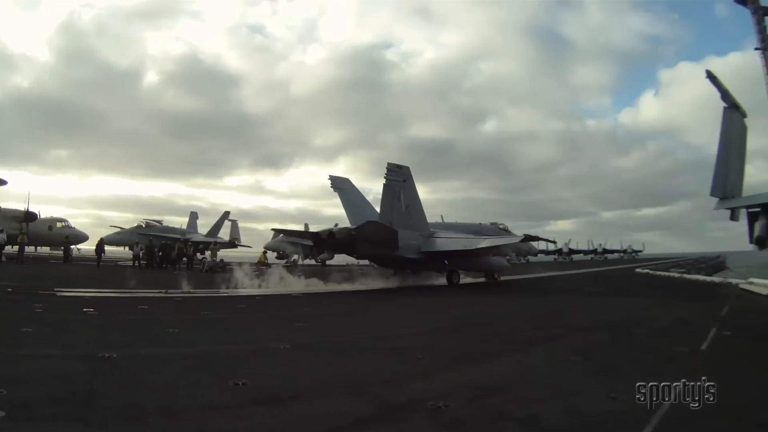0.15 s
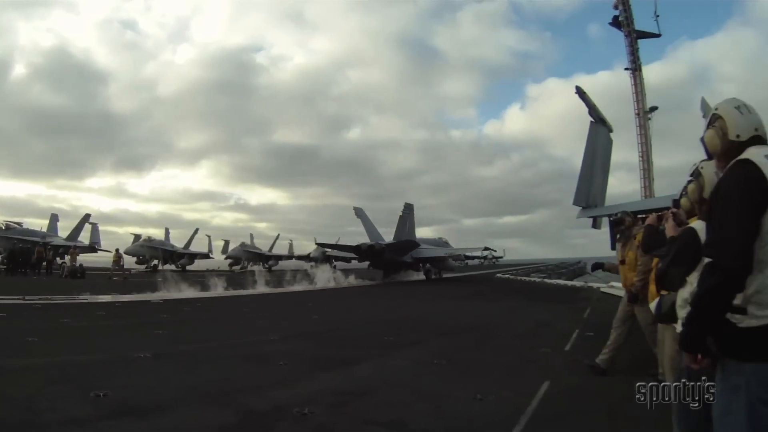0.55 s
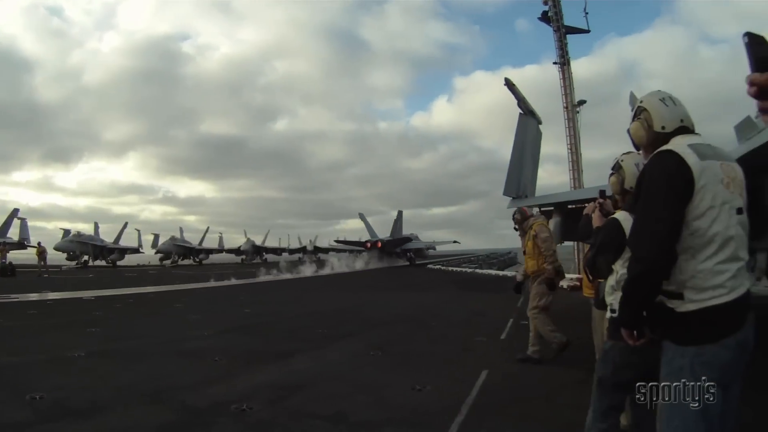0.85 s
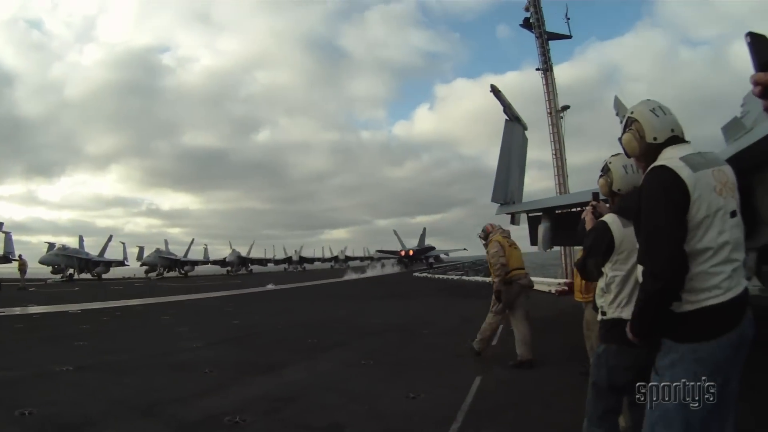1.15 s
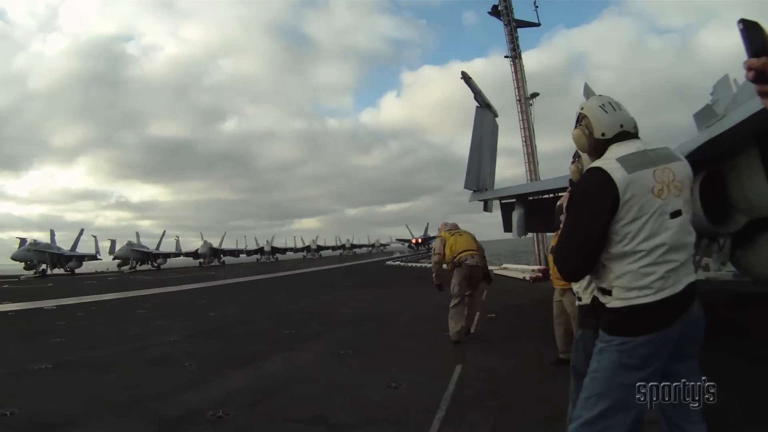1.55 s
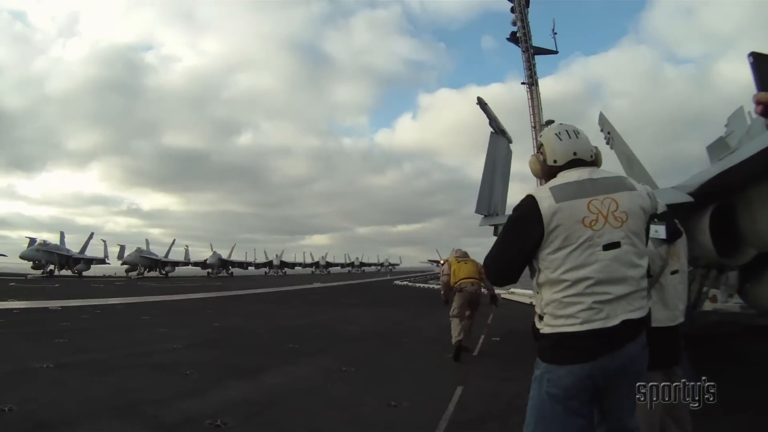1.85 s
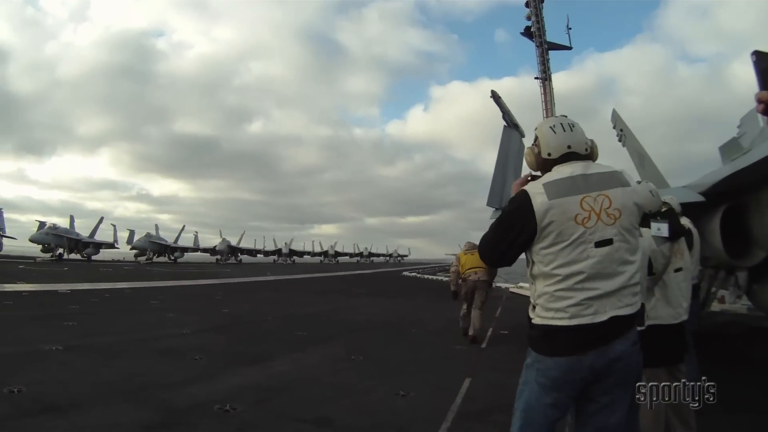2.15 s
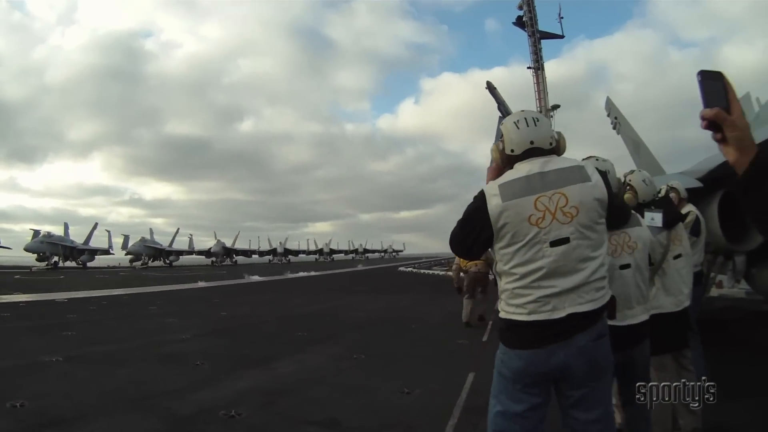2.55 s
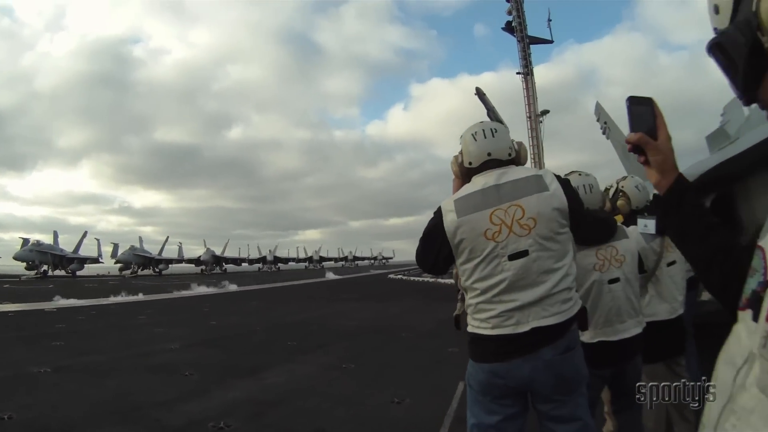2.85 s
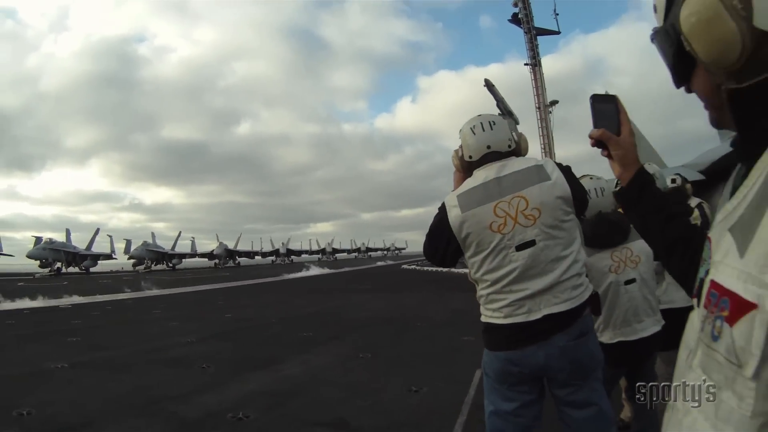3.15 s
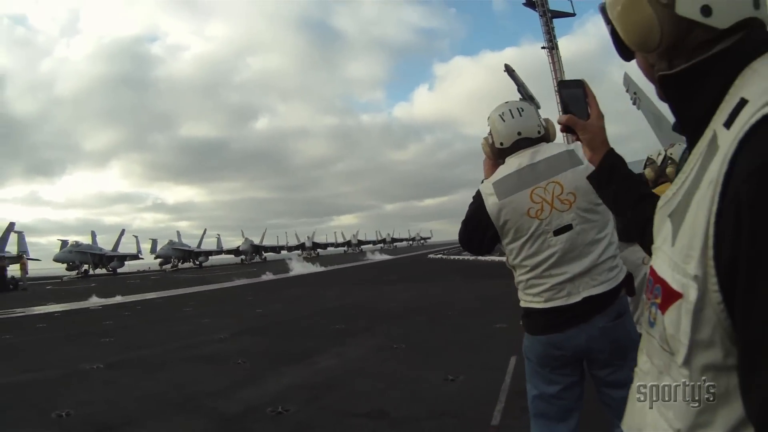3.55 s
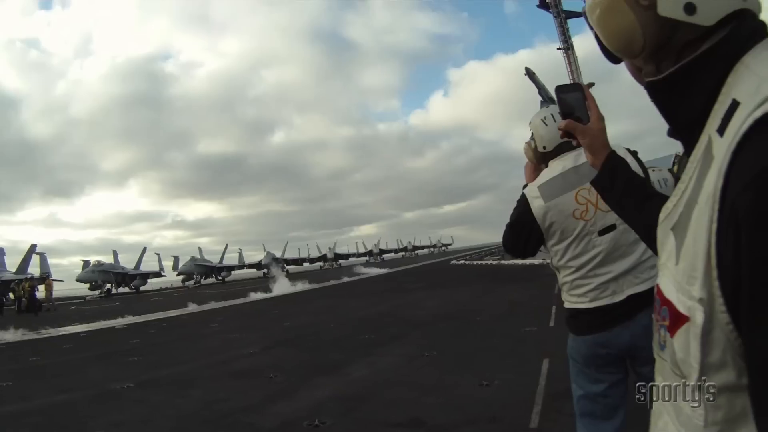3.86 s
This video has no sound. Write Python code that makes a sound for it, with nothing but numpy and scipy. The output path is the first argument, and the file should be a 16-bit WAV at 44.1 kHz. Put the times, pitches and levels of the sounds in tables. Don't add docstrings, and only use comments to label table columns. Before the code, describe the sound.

Deafening fighter jet roar, distorted at first, fades away across a ship deck, then echoes faintly

```python
import sys
import numpy as np
from scipy import signal
from scipy.io import wavfile
from scipy.ndimage import uniform_filter1d

SR = 44100
rng = np.random.default_rng(int(sys.argv[2]) if len(sys.argv) > 2 else 0)


def linear_from_db(decibels):
    return 10 ** (np.asarray(decibels, float) / 20)


def bounce(signal):
    frames = np.transpose(np.atleast_2d(signal))
    limited = np.clip(frames, -1, 1)
    pcm = np.round(limited * 32767).astype(np.int16)
    wavfile.write(sys.argv[1], SR, pcm)


N = 176400
TIME = np.arange(N) / SR


def evened(x):
    return x / np.sqrt(np.mean(x ** 2) + 1e-20)


def read(points, hz):
    f, value = np.transpose(points)
    return np.interp(np.log(hz + 1), np.log(f + 1), value)


def curve(rows, column):
    rows = np.array(rows)
    return np.interp(TIME, rows[:, 0], rows[:, column])


def drift(low_hz, top_hz, t):
    f = np.geomspace(low_hz, top_hz, 30)[:, None]
    phase = rng.random(f.shape)
    waves = np.sin(2 * np.pi * (f * t + phase)) / np.sqrt(f)
    return evened(waves.sum(0))


def turbulence(colour, patch_db, flicker_db, air_db_per_s=0, lean=((0, 0), (1, 0))):
    size, hop = 1024, 256
    frames, hz = N // hop + 5, np.fft.rfftfreq(size, 1 / SR)
    t = np.arange(frames) * hop / SR
    real, imaginary, patches = rng.standard_normal((frames, len(hz), 3)).T

    patches = uniform_filter1d(patches, size=14, axis=0)
    patches = evened(uniform_filter1d(patches, size=10, axis=1))

    air_db = air_db_per_s * np.outer((hz / 10000) ** 1.5, t)
    octaves_below = np.clip(np.log2(2500 / (hz + 1)), 0, 1)
    lean_db = np.outer(octaves_below, np.interp(t, *np.transpose(lean)))
    level_db = colour(hz)[:, None] + patch_db * patches + lean_db - air_db

    spectra = (real + 1j * imaginary) * linear_from_db(level_db)
    noise = evened(signal.istft(spectra, nperseg=size, noverlap=size - hop)[1][:N])
    return noise * linear_from_db(flicker_db * drift(6, 90, TIME))


# (frequency [Hz], density [dB per Hz])
CASE_LOW = [(25, -27), (100, -25), (220, -28.5), (600, -14), (1120, -3), (1290, 2.5), (1470, -8),
            (1740, -15.5)]
CASE_HIGH = [(1950, -9), (2900, -6), (3600, -3.5), (4200, 3.7), (5600, -13.5), (9800, -28), (11800, -33.5),
             (14500, -56)]


def through_case(hz):
    return read(list(CASE_LOW) + list(CASE_HIGH), hz)


# (time [s], roar level before overload [dB], aft rumble against roar [dB])
JET_PASS = [(0, -8, -19), (.3, -5, -21), (.6, -5.5, -7.5), (.85, -8, -9), (1.15, -13, -6),
            (1.35, -15.5, -9.5), (1.55, -17.5, -9.5), (1.7, -20, -10.5), (2.0, -19, -18.5), (2.2, -21, -19),
            (2.45, -25, -11), (2.55, -27, -12.5), (2.64, -32.5, -6.5), (2.76, -37.5, -6.5),
            (3.0, -39.5, -8.5), (3.35, -44.5, -8), (4, -37.5, -32)]
# (frequency [Hz], density [dB per Hz])
EDDY_RUMBLE = [(30, -23), (70, -11.5), (130, -0.5), (210, 3.4), (300, -3), (500, -1.5), (850, -1),
               (1300, -39.5)]
# (time [s], lean below 2.5 kHz, full from 1.25 kHz down [dB])
EXHAUST_LEAN = [(0, 1.6), (.2, 0.5), (.36, 5), (.6, 2.6), (.8, -0.9), (1.15, 2.2), (1.55, -0.5),
                (1.95, -2.1), (2.5, 2.7)]


def jet():
    patch_db, flicker_db = 0.45, 0.64
    roar = turbulence(through_case, patch_db, flicker_db, air_db_per_s=7, lean=EXHAUST_LEAN)
    rumble = turbulence(lambda hz: read(EDDY_RUMBLE, hz), patch_db, flicker_db)
    gusts_db = 0.25 * drift(1.353, 9, TIME)
    level = linear_from_db(curve(JET_PASS, column=1) + gusts_db)
    return level * (roar + linear_from_db(curve(JET_PASS, column=2)) * rumble)


# (time [s], level [dB])
ECHO_SWELL = [
    (3.3, -70),
    (3.44, -55),
    (3.47, -42.5),
    (3.63, -38),
    (3.68, -36),
    (3.76, -35),
    (3.86, -31),
    (3.92, -34.5),
    (4, -38),
]
# (frequency [Hz], tilt [dB])
ECHO_TILT = [(100, -5.5), (400, 11.5), (700, 7), (1000, 9.5), (1280, 3), (1550, 7.5), (2100, 0.5),
             (9000, -13.5)]
# (time [s], lean below 2.5 kHz, full from 1.25 kHz down [dB])
ECHO_LEAN = [(3.45, 2), (3.63, -9.5), (3.67, 2), (3.78, -1.5), (3.87, -3), (3.92, -8), (4, -2)]


def echo():
    reflected = turbulence(lambda hz: through_case(hz) + read(ECHO_TILT, hz),
                           patch_db=1.4, flicker_db=0.8, lean=ECHO_LEAN)
    return linear_from_db(curve(ECHO_SWELL, column=1)) * reflected


# (frequency [Hz], tilt [dB])
DECK_TILT = [(40, 20), (120, 21.5), (215, 31.5), (300, 20), (600, 9.5), (1500, -10), (4200, -2),
             (10000, -13)]


def deck():
    idle = turbulence(lambda hz: through_case(hz) + read(DECK_TILT, hz), patch_db=1.1, flicker_db=0.6)
    return linear_from_db(-42) * idle


def scene():
    return (jet() + echo() + deck())[None]


def flattened(x, ceiling):
    knee = 14.0
    return x / (1 + abs(x / ceiling) ** knee) ** (1 / knee)


def low_pass(x):
    return signal.sosfilt(signal.butter(12, 15180, fs=SR, output="sos"), x)


def record(dry):
    ceiling = linear_from_db(-6.1 - 0.6 * np.clip(TIME - 0.5, 0, 1))
    overloaded = flattened(dry, ceiling)
    coupling_hz = 520
    tilted = signal.lfilter(*signal.butter(1, coupling_hz, "high", fs=SR), overloaded)
    trimmed = flattened(tilted, ceiling * linear_from_db(1.5))
    return low_pass(trimmed)


dry = scene()
out = record(dry)
bounce(out)
```